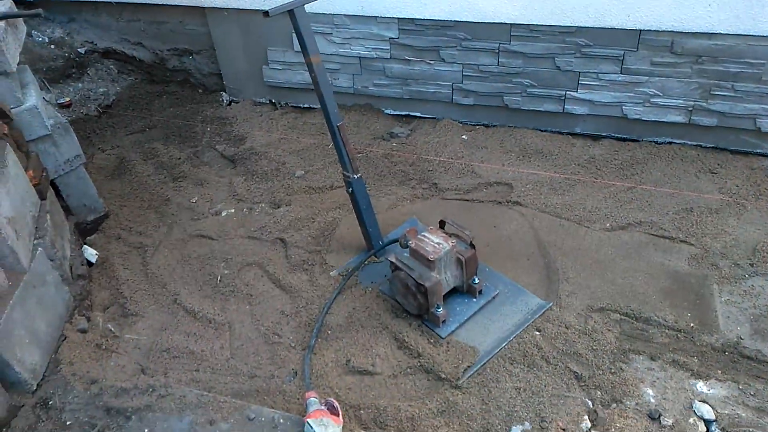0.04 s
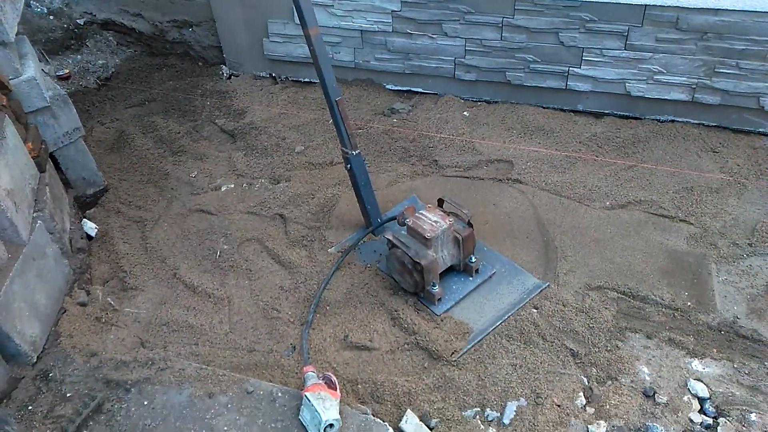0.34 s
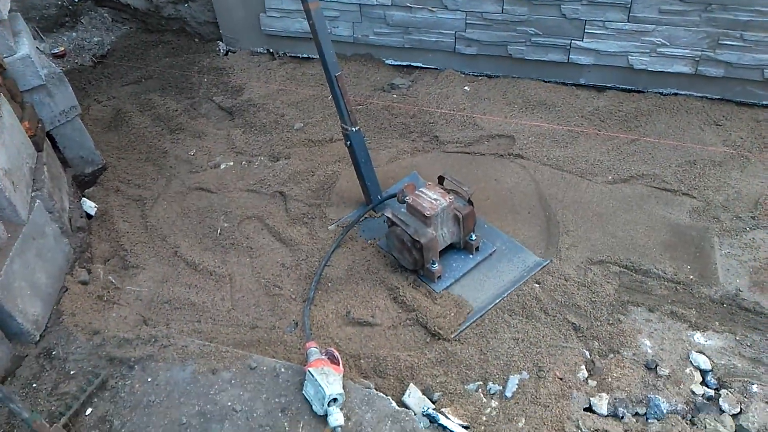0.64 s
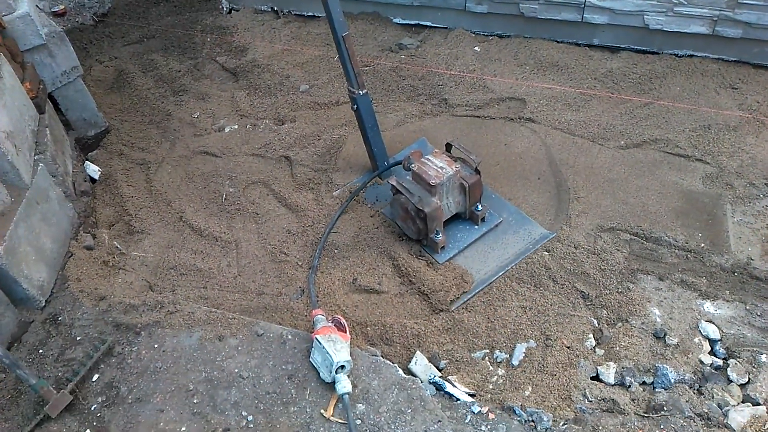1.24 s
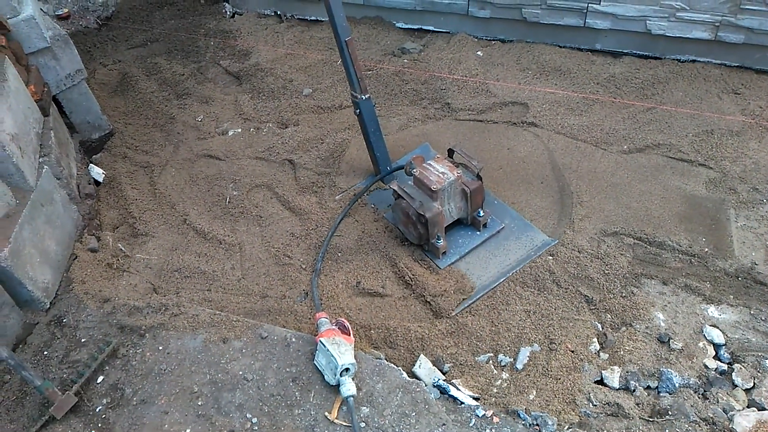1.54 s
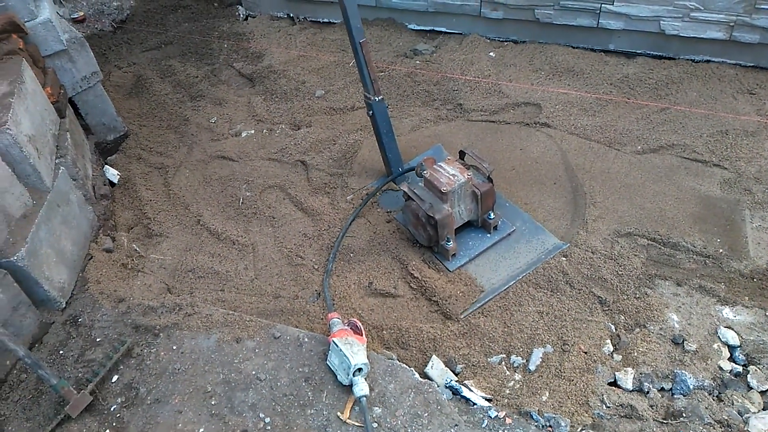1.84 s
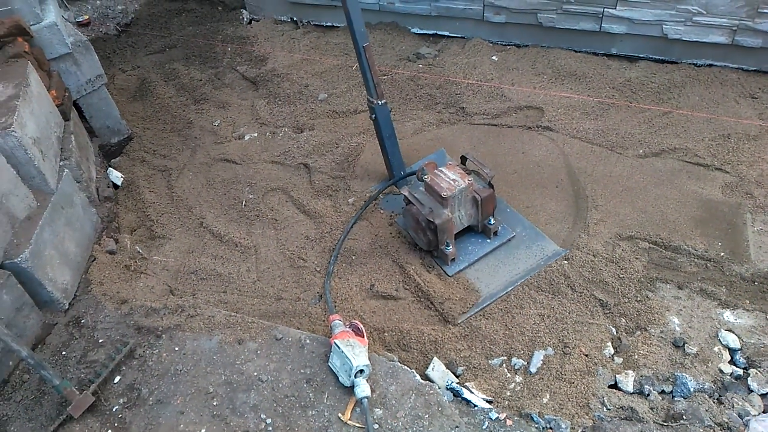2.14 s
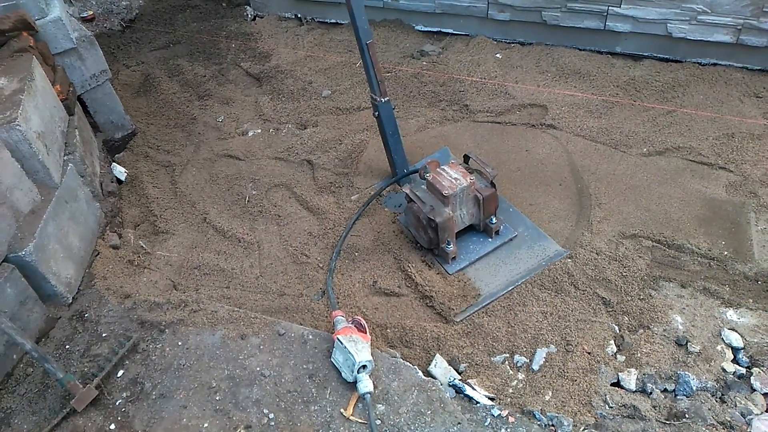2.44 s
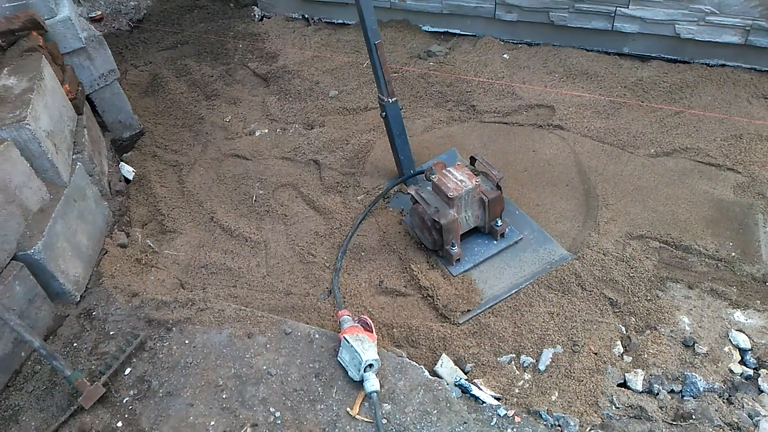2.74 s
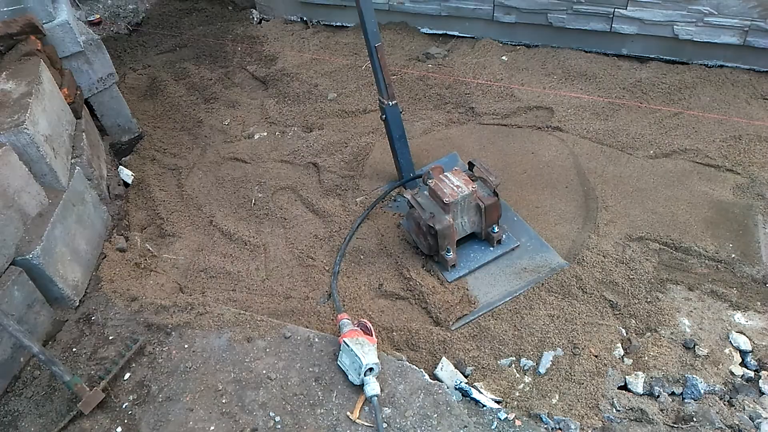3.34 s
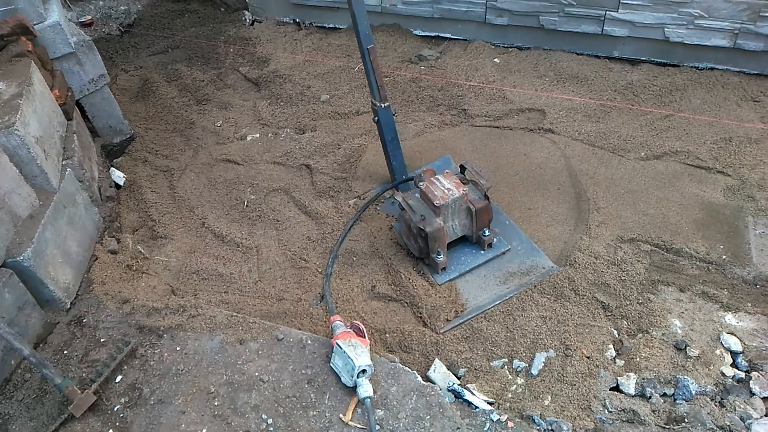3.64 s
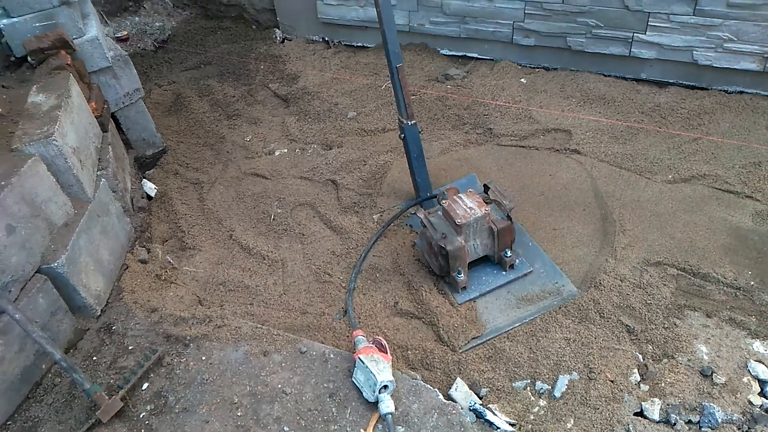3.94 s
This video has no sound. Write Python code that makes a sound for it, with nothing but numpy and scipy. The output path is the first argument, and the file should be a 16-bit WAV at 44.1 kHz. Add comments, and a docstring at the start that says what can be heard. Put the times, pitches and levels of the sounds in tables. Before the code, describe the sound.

A vibrating plate compactor runs nonstop on sand beside a wall, straight in front of the microphone. Its rapid, ringing metal slams carry small rough squeaks, then turn softer and busier, ending with a gritty scrape.

```python
"""Plate compactor beside a wall

An electric plate compactor works on sand, straight ahead of the microphone. Every fourth turn of its
shaft the steel plate lands with a thump and slams into a ringing chatter, each bounce much like the
last; the housing rattles and the wall throws the chatter back. After two seconds the plate bites into
looser sand: the slams soften, a rebound fills the gaps, and at the end the plate scrapes."""
import sys
import numpy as np
from scipy import signal
from scipy.fft import rfft, irfft
from scipy.io import wavfile
from scipy.ndimage import uniform_filter1d, map_coordinates

SR = 44100
rng = np.random.default_rng(int(sys.argv[2]) if len(sys.argv) > 2 else 0)


def waveform_to_disk(signal):
    """Save audio, clipped to [-1, 1], as 16-bit WAV at the path in sys.argv[1]."""
    frames = np.transpose(np.atleast_2d(signal))
    scaled = np.clip(frames, -1, 1) * 32767
    samples = np.round(scaled).astype(np.int16)
    wavfile.write(sys.argv[1], SR, samples)


N = 176400
BOUNCE_HZ, FIRST_SLAM_S = 12.391, 0.07387
# How the plate lands: t/s, slam delay/s, swell/s, fall/(dB/s), thump after the slam/s
GAIT = [(0, -0.0033, 0.013, 437, 0.067), (1.2, 0.00076, 0.012, 461, 0.06),
        (2.17, -0.00055, 0.0086, 408, 0.062), (2.3, 0.004, 0.023, 330, 0.0545),
        (2.85, -0.00088, 0.026, 334, .056), (3.05, -0.0012, 0.017, 320.5, 0.06),
        (3.35, 0.0049, 0.018, 334, 0.052), (3.47, -0.013, 0.0153, 288, 0.042),
        (3.62, -0.016, 0.017, 300, 0.059), (3.75, -.008, 0.018, 301, 0.036),
        (4, -0.025, 0.0097, 305, 0.065)]


def amp(db):
    return 10 ** (np.asarray(db) / 20)


def unit(x):
    return x / np.sqrt(np.mean(np.abs(x) ** 2) + 1e-20)


def at(rows, times, column=1):
    """A column of a table at the given times."""
    rows = np.array(rows)
    return np.interp(times, rows[:, 0], rows[:, column])


def clock():
    return np.arange(N) / SR


def wobble(rate):
    """A smooth random curve, rate knots a second."""
    return map_coordinates(rng.standard_normal(int(N * rate / SR) + 4), [clock() * rate])


def frequencies():
    return np.fft.rfftfreq(2 * N, 1 / SR)


def filtered(x, response):
    return irfft(rfft(x, 2 * N) * response)[..., :N]


def colour(points):
    """Causal response through (f/Hz, level/dB) points."""
    hz, db = np.transpose(points)
    cepstrum = irfft(np.log(amp(np.interp(np.log(frequencies() + 1), np.log(hz), db))))
    cepstrum[1:N] *= 2
    cepstrum[N + 1:] = 0
    return np.exp(rfft(cepstrum))


def resonances(modes, column=2):
    """Causal response of modes (f/Hz, width/Hz, ...) with their levels in the given column."""
    f = frequencies()
    return sum(amp(m[column]) * 1j * f * m[1] / (m[0] ** 2 - f * f + 1j * f * m[1]) for m in modes)


def recurring(memory):
    """Noise that comes back with every bounce, keeping a share of its pattern."""
    size = round(SR / BOUNCE_HZ)
    rows = rng.standard_normal((N // size + 1, size))
    for k in range(1, len(rows)):
        rows[k] = memory * rows[k - 1] + np.sqrt(1 - memory ** 2) * rows[k]
    return rows.ravel()[:N]


def impacts(memory, threshold):
    """Tiny contacts: the peaks of a recurring noise."""
    noise = recurring(memory)
    return unit(np.sign(noise) * np.maximum(np.abs(noise) - threshold, 0))


def slam_times():
    """When each slam starts, slightly off the even beat."""
    beats = FIRST_SLAM_S + np.arange(-1, N / SR * BOUNCE_HZ) / BOUNCE_HZ
    return beats + at(GAIT, beats)


def burst(start, swell_s, fall_db_per_s, onset_db):
    """Envelope that fades in onset_db under its top, swells to full and dies away."""
    t = clock() - start
    live = t > 0
    t, envelope = t[live], np.zeros(N)
    db = np.minimum(-onset_db * (1 - t / swell_s), -fall_db_per_s * (t - swell_s))
    envelope[live] = np.clip(t / 0.0032, 0, 1) * amp(db)
    return envelope


def bursts(starts, levels, swell_s, fall_db_per_s, onset_db):
    """Envelope of one burst a bounce, each peaking on the level curve."""
    rows = zip(*np.broadcast_arrays(starts, swell_s, fall_db_per_s))
    return np.sqrt(sum((amp(at(levels, start + swell)) * burst(start, swell, fall, onset_db)) ** 2
                       for start, swell, fall in rows))


def chirps(centres, levels, hz, length_s, slope_hz, dip_hz, scatter_rad, rough):
    """Short gliding tones: over one length the pitch moves by slope_hz and curves up by dip_hz."""
    tones, start_phase = np.zeros(N, complex), 2 * np.pi * rng.random()
    t = clock()
    chance = rng.standard_normal((len(centres), 2))
    for centre, f, (turn, stray_db) in zip(centres, np.broadcast_to(hz, centres.shape), chance):
        near = slice(*np.searchsorted(t, [centre - 2 * length_s, centre + 2 * length_s]))
        u = (t[near] - centre) / length_s
        cycles = np.cumsum(f + slope_hz * u + dip_hz * u * u) / SR
        phase = 2 * np.pi * cycles + start_phase + scatter_rad * turn
        tones[near] += amp(at(levels, centre) + stray_db) * np.exp(-u * u + 1j * phase)
    return np.real(tones * unit(1 + rough * (wobble(200) + 1j * wobble(200))))


def steel(force, modes, modes_db, direct):
    """Contacts heard directly and through the modes of a steel part, at the level of the force."""
    contacts = unit(filtered(force, colour(direct)))
    ringing = amp(modes_db) * unit(filtered(force, modes))
    return force.std() * unit(contacts + ringing)


def patchy(x, depth_db):
    """Gives every contact a slightly different colour."""
    spectra = signal.stft(x, nperseg=256)[2]
    patches = uniform_filter1d(rng.standard_normal(spectra.shape), size=4, axis=0)
    patches = unit(uniform_filter1d(patches, size=7, axis=1))
    return x.std() * unit(signal.istft(spectra * amp(depth_db * patches), nperseg=256)[1][:N])


def chatter(slam_gain_db=4.5, rebound_gain_db=-1, rebound_s=0.0422):
    """The steel plate chatters in every slam and again as it rebounds."""
    # Contact force in the slams and between them: t/s, level/dB
    slam_levels = [(0.1, -20), (1.061, -19.5), (1.47, -18.5), (1.71, -20.5), (2.03, -18), (2.11, -20.5),
                   (2.27, -24.5), (2.6, -22.5), (2.76, -26.5), (2.84, -24), (2.92, -27), (3.08, -23.5),
                   (3.16, -24), (3.65, -24.5), (3.73, -29.5), (3.81, -26.5), (3.89, -22.5), (3.97, -31)]
    rebound_levels = [(0.1, -31), (1.0, -32), (1.95, -29), (2.15, -32), (2.27, -18), (2.8, -21.5),
                      (3.05, -23), (3.3, -22.5), (3.45, -19), (3.6, -21), (3.75, -22), (3.97, -29)]
    # Plate modes: f/Hz, width/Hz, level in a slam/dB, level in a rebound/dB
    modes = [(3463, 8.3, 5, 2), (3555, 30, 4.5, 12), (3810, 18, 0, 9), (3803, 61, 2.5, -6),
             (4040, 39, 5.5, -14), (4440, 47, 0, -13), (4634, 14, -1, -4), (4980, 12, -1, 0),
             (5430, 39.3, 1, -20), (5780, 55, -19, -23.5), (6144, 75, 0.5, -17.5), (6348, 24, -5.5, -4),
             (7200, 52, 2, -2), (8740, 115, -10, -13.5)]
    # Colour of the bare contacts: f/Hz, level/dB
    contact = [(300, -26), (1100, -11.5), (2000, 2.5), (3000, 1), (4000, 5), (6400, 6.5), (7800, -7),
               (9600, -2.5), (11000, -11.5), (13000, -4.5), (14400, -22)]
    starts = slam_times()
    slam = bursts(starts, slam_levels, at(GAIT, starts, 2), at(GAIT, starts, 3), onset_db=8)
    slam *= impacts(memory=0.62, threshold=1.21)
    rebound = bursts(starts + rebound_s, rebound_levels, swell_s=0.011, fall_db_per_s=523.5, onset_db=6.5)
    rebound *= impacts(memory=0.3, threshold=2.43)
    slam = steel(slam, resonances(modes, column=2), modes_db=-4.5, direct=contact)
    rebound = steel(rebound, resonances(modes, column=3), modes_db=6, direct=contact)
    return patchy(amp(slam_gain_db) * slam + amp(rebound_gain_db) * rebound, depth_db=2.0)


def wall(x, gain_db=-1.5, t60_s=0.057):
    """Short scatter from the nearby wall and stacked slabs."""
    t = np.arange(SR // 6) / SR
    tail = rng.standard_normal(len(t)) * amp(-60 * t / t60_s) * (t > .002)
    return amp(gain_db) * signal.fftconvolve(x, tail / np.linalg.norm(tail))[:N]


def ring(hz, levels, gain_db, fall_db_per_s, swell_s=0.014, onset_db=9, rough=0.37):
    """One mode, pumped up by each slam in a new phase."""
    swing = sum(amp(at(levels, start + swell_s) + rng.normal(0, 0.44)) * np.exp(2j * np.pi * rng.random())
                * burst(start, swell_s, fall_db_per_s, onset_db) for start in slam_times())
    jostle = unit(1 + rough * (wobble(140) + 1j * wobble(140)))
    return amp(gain_db) * np.real(swing * jostle * np.exp(2j * np.pi * hz * clock()))


def main_modes():
    """The plate's two main modes and the frame's one clear mode ring with the slams."""
    # Swing of each mode: t/s, level/dB
    plate_low = [(0.1, -19.5), (0.42, -24.5), (0.74, -24.5), (0.98, -23.5), (1.06, -33.5), (1.31, -23),
                 (1.87, -44), (1.95, -25.0), (2.27, -45), (2.35, -31), (2.6, -46), (2.84, -38), (2.92, -43),
                 (3.16, -36.5), (3.32, -47), (3.57, -30.5), (3.65, -50), (3.97, -34)]
    plate_high = [(0.1, -21), (0.661, -19), (0.9, -25), (0.98, -17.5), (1.06, -21), (1.47, -22.5),
                  (1.55, -31), (1.63, -25), (1.79, -29.5), (1.95, -21), (2.269, -28), (2.52, -24.5),
                  (2.92, -37), (3.08, -29.5), (3.65, -24), (3.73, -33), (3.89, -23), (3.97, -33)]
    frame = [(0.1, -48), (2.2, -56.5), (2.6, -36), (3.3, -42), (3.7, -38.5), (4, -51)]
    return (ring(2756, plate_low, gain_db=11, fall_db_per_s=376)
            + ring(3443, plate_high, gain_db=10.5, fall_db_per_s=334)
            + ring(631, frame, gain_db=6.5, fall_db_per_s=212, swell_s=.006, onset_db=7, rough=0.42))


def housing(gain_db=2):
    """The motor housing rattles on through most of each bounce."""
    # Force of the rattle: t/s, level/dB
    levels = [(0.1, -30.5), (1.22, -29), (1.95, -32), (2.271, -30.9), (2.68, -29), (2.92, -30.5),
              (3.65, -28), (3.97, -28)]
    # Housing modes: f/Hz, width/Hz, level/dB
    modes = [(1320.8, 10, 14.5), (1429, 62, 4), (1576, 72, 1.5), (1744, 30, 14), (2057, 35, 14.5),
             (2260.7, 11.7, 15), (2563, 23, 2)]
    # Colour of the bare clacks: f/Hz, level/dB
    clack = [(300, -18.5), (800, 1), (1150, -19.5), (1350, 0.5), (1900, -1.5), (2500, -2), (3200, -5),
             (6000, -54.5)]
    force = bursts(slam_times(), levels, swell_s=0.0159, fall_db_per_s=114, onset_db=8.5)
    force *= impacts(memory=0.769, threshold=2.19)
    return amp(gain_db) * steel(force, resonances(modes), modes_db=5, direct=clack)


def motor(peak_s=.062):
    """The unbalanced shaft hums, swelling once a bounce."""
    # Shaft harmonics: multiple of the bounce rate, level/dB
    harmonics = [(4, -92.5), (8, -68), (12, -52.5), (28, -59.5)]
    phase = 2 * np.pi * BOUNCE_HZ * (clock() - peak_s)
    hum = sum(amp(db) * np.sin(k * phase + 2 * np.pi * rng.random() + .15 * wobble(3.3))
              for k, db in harmonics)
    return np.sqrt(2) * hum * (1 + np.cos(phase))


def air(level_db=-54):
    """Faint, steady open air behind the machine."""
    # Colour of the air: f/Hz, level/dB
    spectrum = [(20, -24), (100, -1), (300, -5), (1000, 2), (5000, -54), (15000, -37.5)]
    return amp(level_db) * unit(filtered(rng.standard_normal(N), colour(spectrum)))


def landing(tone_gain_db=4.5, thud_gain_db=1, knock_gain_db=2, thump_lead_s=0.016, slam_lead_s=0.00317):
    """The plate thumps the sand with a dipping pitch; the frame knocks with the thump and the slam."""
    # Thump of the sand and knock of the frame: t/s, level/dB
    thump_levels = [(0.1, -43), (1.3, -41.5), (2.5, -39), (2.761, -41.5), (3.24, -38), (3.6, -42),
                    (3.97, -43.5)]
    knock_levels = [(0.1, -49), (0.66, -37), (2.11, -34), (2.6, -33.5), (3.32, -35.5), (3.97, -33)]
    # Pitch at the bottom of the thump's dip: t/s, f/Hz
    pitch = [(0, 237.6), (1.2, 277), (2.2, 315), (2.7, 351), (3.3, 375), (3.6, 453), (4, 456)]
    # Colours of sand and frame: f/Hz, level/dB
    sand = [(20, -61.5), (60, -51), (110, -17), (150, -11), (185, -7), (240, 6), (330, -1.5), (450, -9),
            (700, -25), (2000, -42)]
    frame = [(100, -36), (250, -14), (380, -9), (490, -1), (560, -8.5), (640, -1.5), (720, -14.5),
             (850, -5), (1100, -11.5), (2500, -47)]
    slams = slam_times()
    deepest = slams + at(GAIT, slams, 4)
    tone = chirps(deepest, thump_levels, at(pitch, deepest), length_s=0.011, slope_hz=-14, dip_hz=146.3,
                  scatter_rad=0.184, rough=0.49)
    thud = bursts(deepest - thump_lead_s, thump_levels, swell_s=0.018, fall_db_per_s=396, onset_db=3)
    thud *= recurring(memory=0.98)
    on_thump = bursts(deepest - thump_lead_s, knock_levels, swell_s=0.011, fall_db_per_s=413, onset_db=5)
    on_slam = bursts(slams - slam_lead_s, knock_levels, swell_s=0.0076, fall_db_per_s=375, onset_db=4)
    knocks = np.hypot(on_thump, on_slam) * recurring(memory=0.922)
    return (amp(tone_gain_db) * np.sqrt(2) * tone
            + amp(thud_gain_db) * thud.std() * unit(filtered(thud, colour(sand)))
            + amp(knock_gain_db) * knocks.std() * unit(filtered(knocks, colour(frame))))


def squeaks(after_s=0.056, gain_db=3, spread_hz=160, scatter_s=.003):
    """A rough falling squeak as the plate lifts off the sand, never twice the same."""
    # Sand under the lifting plate: t/s, level/dB
    levels = [(0.1, -49), (.7, -34.5), (1.25, -28), (1.7, -26), (2.1, -34), (2.5, -46), (4, -54)]
    slams = slam_times()
    late, high = rng.standard_normal((len(slams), 2)).T
    return amp(gain_db) * chirps(slams + after_s + scatter_s * late, levels, hz=1750 + spread_hz * high,
                                 length_s=.011, slope_hz=-170, dip_hz=0, scatter_rad=3.22, rough=0.9)


def scrape(slips_hz=48, scatter_s=0.0051, grit_gain_db=-3, depth_db=5):
    """Near the end the plate sticks and slips over grit; every slip is a few falling tones."""
    # Rise of the scrape, slipping from the second row on: t/s, level/dB
    levels = [(0, -55), (3.55, -43.5), (3.72, -40), (3.85, -33.5), (4, -29.5)]
    # Tones of a slip and colour of the grit: f/Hz, level/dB
    slip_tones = [(1600, 6), (2080, 9), (2350, 10.5), (2620, 6.5), (3000, 4)]
    grit_colour = [(300, -40), (1100, -13), (1600, 9), (1850, -11), (2100, -4), (2650, -22), (3200, -8),
                   (8000, -48)]
    slips = np.arange(levels[1][0], N / SR, 1 / slips_hz)
    slips += scatter_s * rng.standard_normal(len(slips))
    tones = sum(amp(db) * chirps(slips, levels, hz, length_s=0.0067, slope_hz=-85, dip_hz=0,
                                 scatter_rad=1.7, rough=0.36) for hz, db in slip_tones)
    pulse = np.cos(2 * np.pi * np.interp(clock(), slips, np.arange(len(slips))))
    grit = unit(filtered(impacts(memory=0.82, threshold=2.12), colour(grit_colour)))
    return tones + amp(grit_gain_db + at(levels, clock()) + depth_db * pulse) * grit


def scene():
    """Everything sits in the middle; only the treble of the chatter spreads left and right."""
    # Chatter in the side channel: f/Hz, level/dB
    width = [(20, -115), (2700, -100), (3700, -61), (4400, -47), (6500, -20), (9000, -5.5), (13000, -12.5),
             (15000, -41)]
    plate = chatter()
    mid = plate + wall(plate) + main_modes() + housing() + motor() + air()
    mid += landing() + squeaks() + scrape()
    side = filtered(chatter(), colour(width))
    return np.array([mid + side, mid - side])


def record(dry, ceiling=.9, top_hz=14550):
    """The recorder rounds off the highest peaks and keeps nothing above its band limit."""
    soft = dry / (1 + np.abs(dry / ceiling) ** 6) ** (1 / 6)
    return filtered(soft, 1 / np.sqrt(1 + (frequencies() / top_hz) ** 260))


dry = scene()
out = record(dry)
waveform_to_disk(out)
```